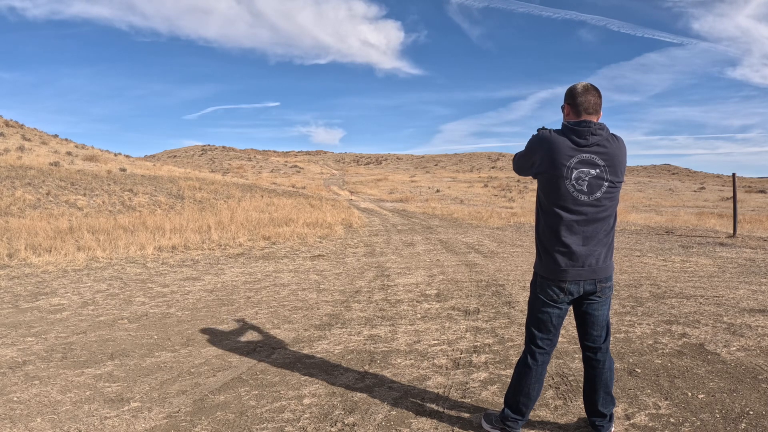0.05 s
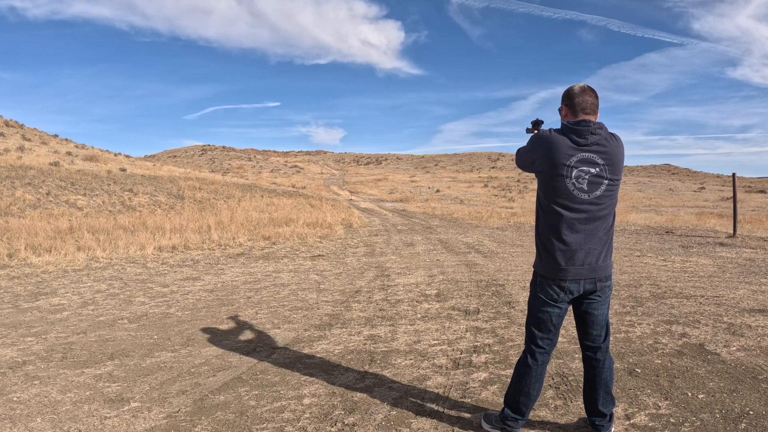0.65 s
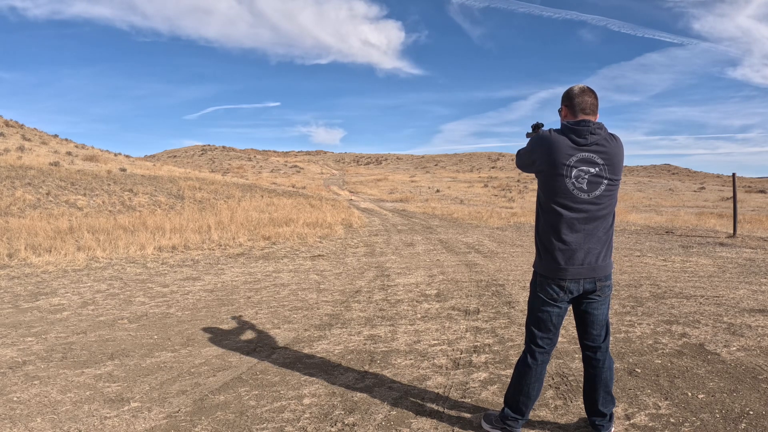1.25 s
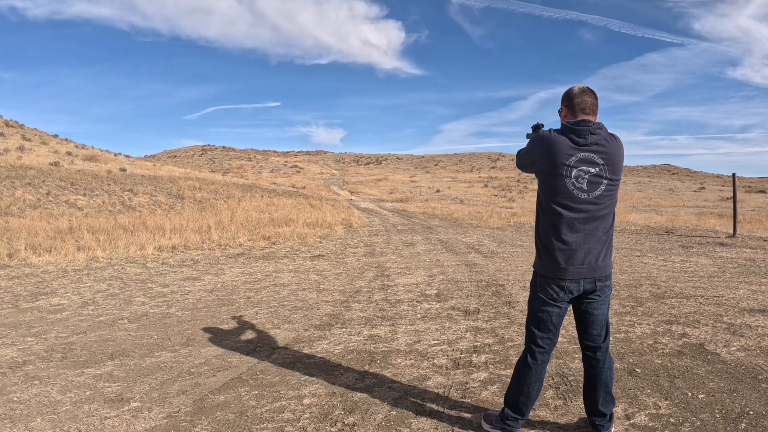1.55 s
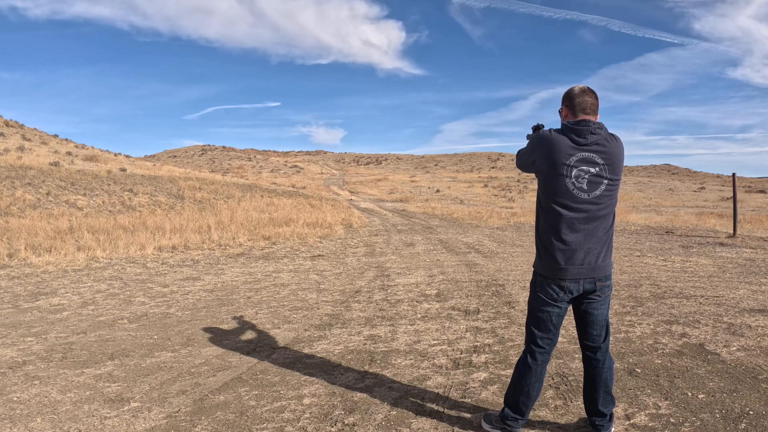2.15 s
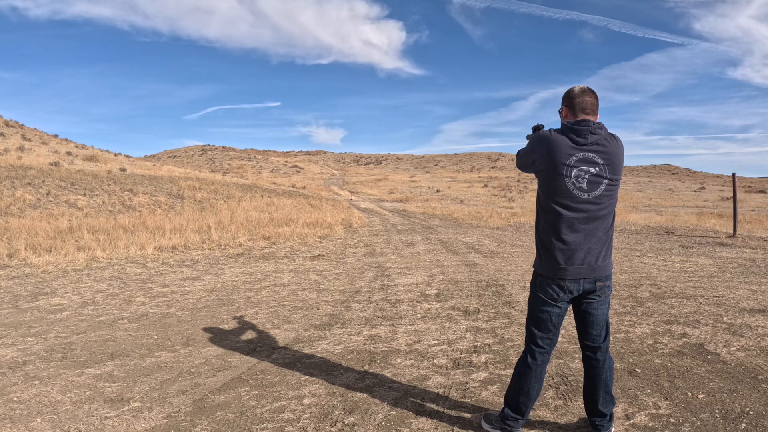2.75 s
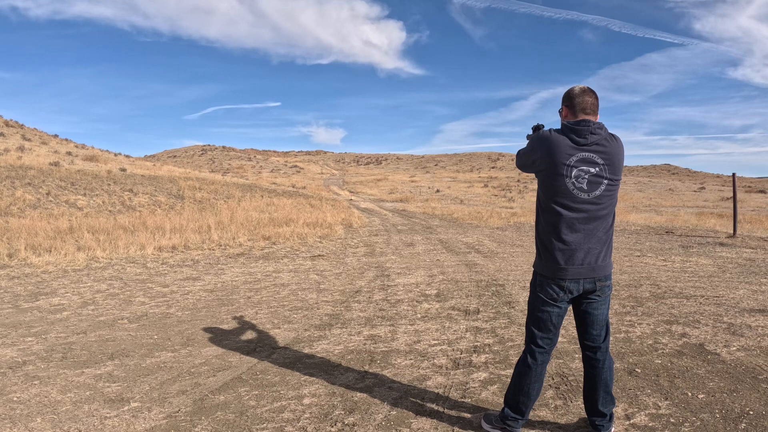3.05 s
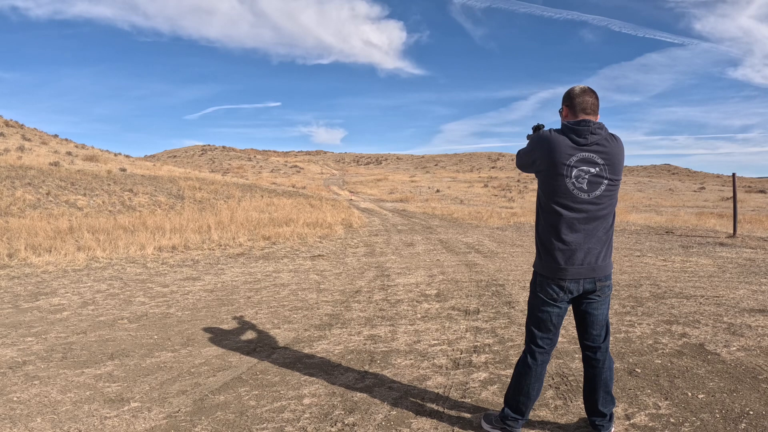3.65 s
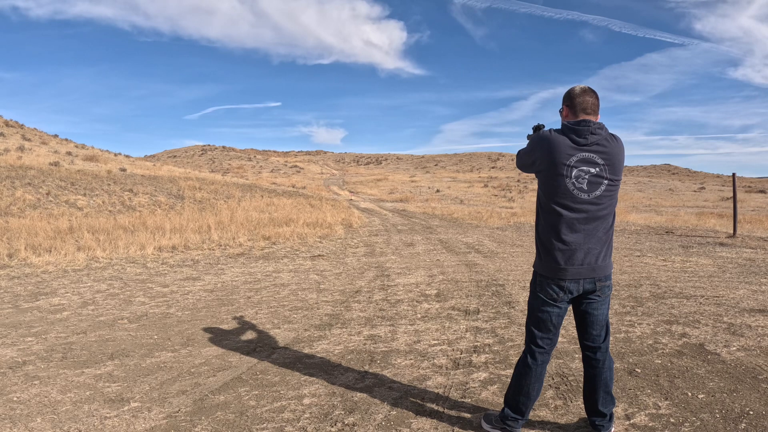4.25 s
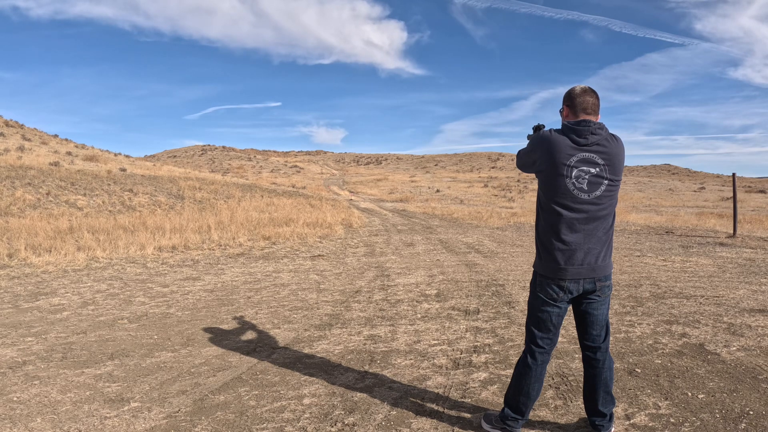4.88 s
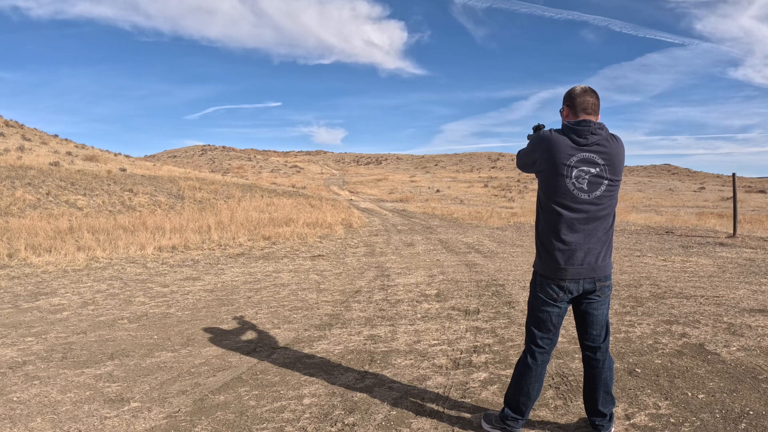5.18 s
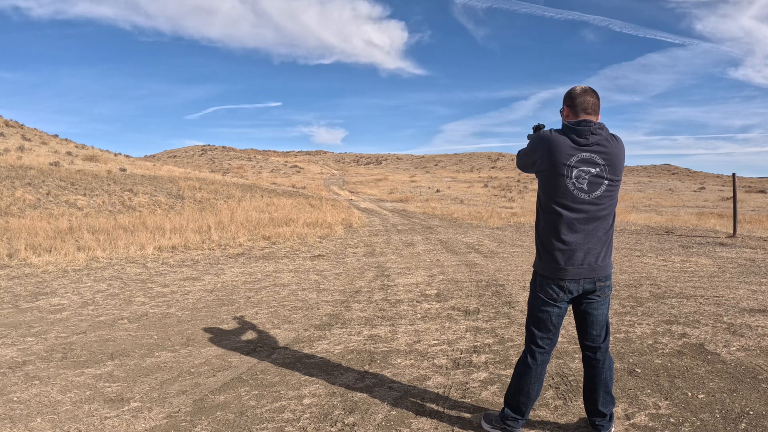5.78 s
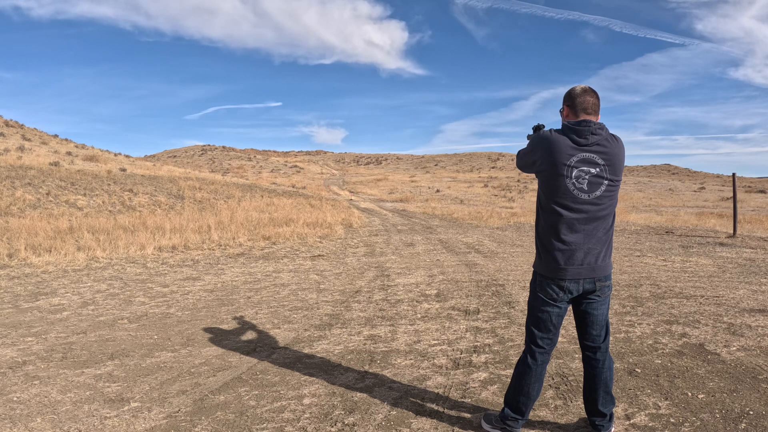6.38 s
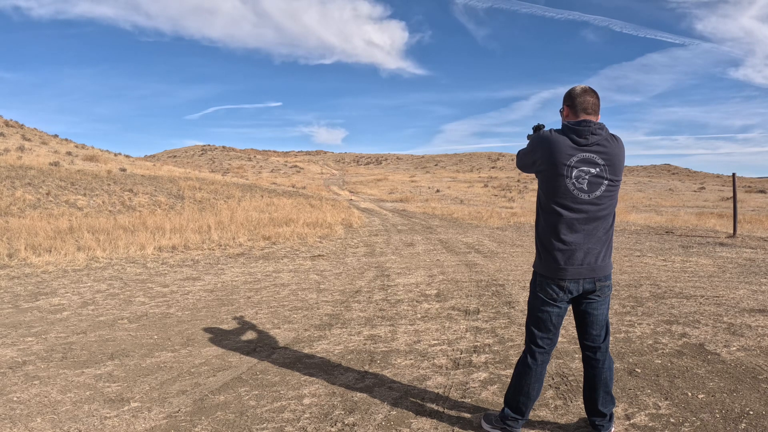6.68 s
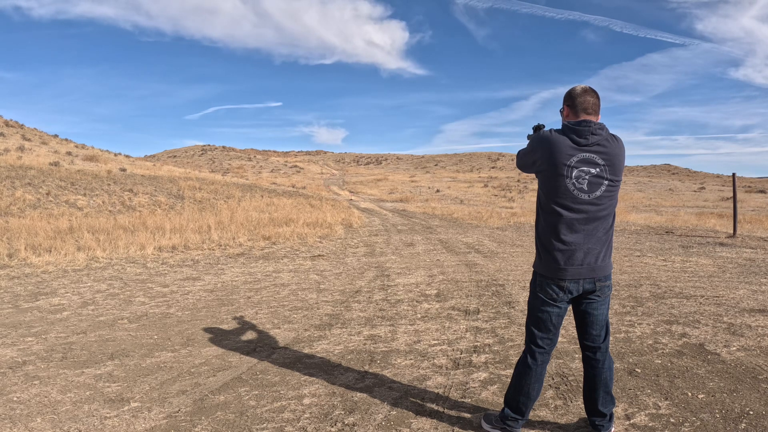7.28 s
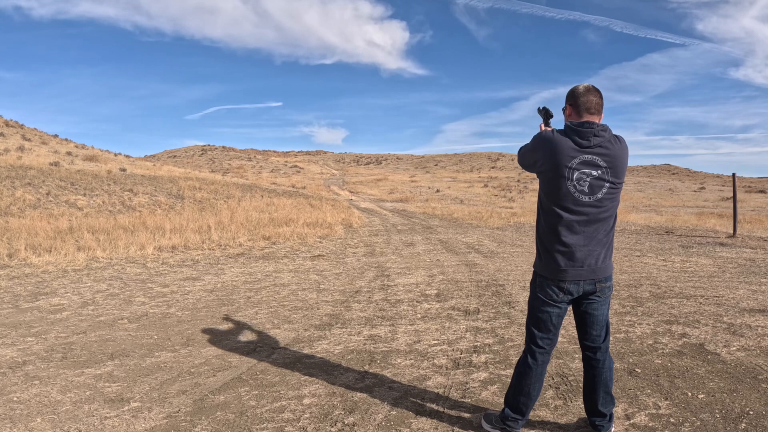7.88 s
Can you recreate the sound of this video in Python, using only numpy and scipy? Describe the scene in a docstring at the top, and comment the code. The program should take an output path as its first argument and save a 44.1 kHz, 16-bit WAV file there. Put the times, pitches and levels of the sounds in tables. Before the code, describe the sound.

A single revolver shot and the clear clang of a hit steel plate follow several seconds of gusty wind buffeting the microphone.

```python
"""A revolver fires on open rangeland, 7.6 s in: a sharp muzzle blast that ground and hillside scatter back.
A third of a second later the bullet hits a steel plate downrange and its modes clang.
At the start the hammer clicks as it is cocked, and the plate still rings from an earlier hit.
Gusts buffet the microphone throughout; distant birds whistle faintly."""
import sys
import numpy as np
from scipy import signal
from scipy.fft import rfft, irfft, next_fast_len
from scipy.io import wavfile
from scipy.ndimage import map_coordinates

SR = 44100
rng = np.random.default_rng(int(sys.argv[2]) if len(sys.argv) > 2 else 0)


def unload_wav(signal):
    """Save mono or channel-first audio to the path in sys.argv[1] as 16-bit WAV at rate SR, clipped to [-1, 1]."""
    wavfile.write(
        sys.argv[1],
        SR,
        np.round(np.clip(np.atleast_2d(signal).T, -1, 1) * 32767).astype(np.int16),
    )


N = 358533
SHOT_S = 7.6101  # blast reaches the microphone
GRAINS_PER_S = 600  # ticks in bullet splash and wind crackle

# spectrum of the noise swell: f/Hz, density/dB
SWELL_SPECTRUM = [(40, -10), (140, 9), (245, 5.5), (420, -14.5), (780, -16.5), (920, 3.5), (1120, -12),
                  (1500, 0.5), (1850, -1.5), (2130, 3.5), (2500, -6.5), (3100, -11.5), (5600, -16),
                  (7600, -13), (9000, -29), (15500, -45.5)]
# blast front and gas heave as damped sines: f/Hz, level/dB, t60/s
FRONT_MODES = [(980, 4, 0.0062), (1460, 1, 0.0072)]
HEAVE_MODES = [(246, -7.5, 0.026), (120, -14, 0.016)]


def revolver(swell_s=0.04, rise_s=0.032, bounce_s=0.00318, bounce_db=-10.5, heave_s=0.00533):
    """The muzzle blast: a sharp front, its ground bounce, then the heave of gas."""
    def pulse(delay_s, modes):
        return sum(ring(since(SHOT_S + delay_s), *mode) for mode in modes)

    # a rough burst of noise swells for 40 ms just before the bang
    swell = amp(-12.5) * envelope(SHOT_S - swell_s, rise_s, hold_s=swell_s - rise_s, t60=0.03)
    rough_burst = swell * noise(SWELL_SPECTRUM, side_db=-13.5)
    bounce = amp(bounce_db) * pulse(bounce_s, FRONT_MODES)
    blast = -(pulse(0, FRONT_MODES) + bounce + pulse(heave_s, HEAVE_MODES))
    # the steep front meets the two microphone ports out of step
    side = amp(-8) * filtered(blast, lambda hz: 1j / (1 + (hz / 4000) ** 2))
    shot = rough_burst + stereo(blast, side)
    return filtered(shot, lambda hz: pan(1, left_db=np.interp(hz, [150, 600], [-5.5, -0.3])))


# bullet strikes: t/s, level/dB, ring t60 factor, treble ring gain/dB
PLATE_STRIKES = [(-.2, -8.5, 1.024, 8), (7.946, -0.5, 2, -6.5)]
# plate modes: f/Hz, flare level/dB, ring level/dB, ring t60/s
PLATE_MODES = [(1233, -53, -55.5, 1.3), (1420, -56, -64, 1.3), (1962, -35, -30, 1.1), (4472, -62, -52, .95),
               (4828, -46, -63, .4), (7246, -40, -60, .5), (7526, -53, -65, .95), (10040, -50, -61, .4),
               (11000, -62, -78, .4), (12530, -59, -67, .45), (13960, -63, -79, .5)]
# fragment splash spectrum: f/Hz, density/dB
SPLASH_SPECTRUM = [(200, -8), (700, -0.5), (2600, -4.5), (4000, -2.5), (6800, -18), (8200, -36),
                   (12500, -23.5), (15000, -54)]


def plate(flare_t60_s=0.28, flutter_db=5, settle_s=0.2, highpass_hz=700):
    """The bullet slaps the steel and splashes; modes flare, then ring on. A low thump sounds with it."""
    low, high, splash, low_thump = np.zeros((4, N))
    shakes = [wobble(90) for _ in range(3)]
    drift_s = 1.5e-5 * wobble(70)  # moving air jitters the travel time
    for s, db, t60_factor, treble_db in PLATE_STRIKES:
        t = since(s + drift_s)
        slap = ring(t, hz=2050, db=db - 0.5, t60=0.0041) * (1 - np.exp(-t / 0.00035))
        low += slap
        splash += bursts([(s, db - 11, 0.005), (s, db - 35, 0.19)])
        low_thump += ring(t, hz=166, db=db - 31, t60=0.032)
        for k, (hz, flare_db, ring_db, t60) in enumerate(PLATE_MODES):
            flare = ring(t, hz, db + flare_db, flare_t60_s)
            lasting = ring(t, hz, db + ring_db, t60 * t60_factor)
            if hz < 3000:
                low += flare + lasting
            else:  # short waves beam, so they flutter while the plate shakes
                flutter = amp(flutter_db * shakes[k % 3] * np.exp(-t / settle_s))
                high += flutter * (flare + amp(treble_db) * lasting) * ramp(s, rise_s=0.0078) ** 2
    grains = unit(amp(3 * wobble(GRAINS_PER_S)))
    fragments = splash * grains * noise(SPLASH_SPECTRUM, side_db=-20)
    clang = low + swinging_tone(PLATE_STRIKES[-1][0]) + pan(high, left_db=2) + fragments
    # a small plate rings with no bass
    return low_thump + filtered(clang, lambda hz: hz ** 4 / (hz ** 4 + highpass_hz ** 4))


def swinging_tone(s, facing_s=0.068, facing_db=14):
    """One beamed mode of the plate struck at s, loudest as the plate swings to face the microphone."""
    facing = amp(facing_db * bump(s + facing_s, width_s=0.014))
    return facing * ramp(s, rise_s=0.018) * ring(since(s), hz=2802, db=-40.5, t60=0.96)


# answering slopes: delay/s, rise/s, hold/s, level/dB
SLOPE_ECHOES = [(.01, 0.053, 0.13, -58.5), (0.171, 0.048, 0.16, -50)]
# ground scatter and hillside spectra: f/Hz, density/dB
GROUND_SPECTRUM = [(40, -26), (130, 3.5), (270, -2.5), (500, -13.5), (1000, -13.5), (2000, -28),
                   (4000, -34.5), (7500, -39.5), (10000, -43.5), (15500, -58)]
HILLSIDE_SPECTRUM = [(150, 3.5), (600, -11), (1500, 1.5), (2800, 3.5), (6600, -9), (8200, -19),
                     (14000, -30.5)]


def landscape(slope_t60_s=0.34):
    """Grass and stones scatter the blast, weaker with distance; a near and a far slope answer."""
    t = since(SHOT_S)
    scatter = amp(-13) * (t > 0) * (1 + t / 0.006) ** -1.15 * noise(GROUND_SPECTRUM, side_db=-24)
    answer = sum(amp(db) * envelope(SHOT_S + delay_s, rise_s, hold_s, slope_t60_s)
                 for delay_s, rise_s, hold_s, db in SLOPE_ECHOES)
    return scatter + answer * amp(1.2 * wobble(63)) * noise(HILLSIDE_SPECTRUM, side_db=-13.5)


# cracks and echoes: t/s, level/dB, t60/s
CRACK_BURSTS = [(7.5681, -34.5, 0.009), (7.685, -24.5, 0.0057), (7.823, -30, 0.018), (7.839, -41, 0.018),
                (7.8552, -31.5, 0.013), (7.859, -43, 0.022), (7.9889, -36, 0.013)]
# their spectrum: f/Hz, density/dB
CRACK_SPECTRUM = [(200, -5), (700, -9), (1400, -4), (2600, 3.5), (4000, -9), (6500, -18), (9000, -43),
                  (15000, -52)]


def cracks():
    """Sharp cracks around the blast and echoes off banks and posts, each with a short pressure front."""
    fronts = sum(ring(since(s), hz=1350, db=db + 2.5, t60=0.0034) for s, db, _ in CRACK_BURSTS)
    return fronts + bursts(CRACK_BURSTS) * noise(CRACK_SPECTRUM, side_db=-17)


# cocking clicks: t/s, level/dB, t60/s
LOCK_CLICKS = [(.038, -61, 0.02), (.0688, -47.5, 0.031), (.083, -55, 0.086)]
# steel click spectrum: f/Hz, density/dB
CLICK_SPECTRUM = [(200, -30.5), (700, -1), (1400, 12), (2200, 13), (3500, 13.5), (6500, -13), (9000, -15),
                  (15000, -43)]


def lockwork():
    """Steel clicks as the hammer is drawn back and the cylinder locks."""
    return bursts(LOCK_CLICKS) * noise(CLICK_SPECTRUM, side_db=-37)


# gusts: t/s, buffet level/dB, rush level/dB
GUSTS = [(0.0, -51.5, -83), (0.2, -41.5, -81.5), (0.6, -44.5, -82), (1.22, -41, -78.5), (1.35, -27, -80),
         (1.44, -40.5, -77.5), (1.6, -32, -71.5), (1.88, -35, -81.5), (2.1, -38, -76.5), (2.38, -51, -81),
         (2.6, -35.5, -81), (2.8, -34, -74.5), (3.12, -31.5, -77.5), (3.3, -40.5, -81), (3.85, -36.5, -78),
         (4.15, -40.5, -80), (4.32, -36, -78.5), (4.55, -35.5, -77), (4.8, -38, -80), (5.5, -43, -80.5),
         (6.1, -29.5, -73.5), (6.23, -34.5, -75.5), (6.36, -42, -74), (6.53, -43.5, -79.5),
         (6.92, -33, -70), (7.5, -30, -67.5)]
# buffet, rush and crunch spectra: f/Hz, density/dB
BUFFET_SPECTRUM = [(10, -2.5), (22, 8), (42, 6.5), (80, -2.5), (135, -21.5), (215, -41.5), (330, -41),
                   (600, -83.5)]
RUSH_SPECTRUM = [(70, -2), (170, 18.5), (260, 12), (400, 1.5), (700, -7), (1400, -14), (2200, -23.5),
                 (4000, -31.5), (8000, -63), (14000, -69)]
CRUNCH_SPECTRUM = [(400, -3.5), (1500, -4), (3800, -1), (5500, -15), (9000, -34.5)]


def wind(drop_s=7.5, drop_db=-18.5, widen_s=5.56):
    """Turbulence rumbles and throbs on the ports in lumps; rushing air and soft crunches sound behind."""
    buffet_db, rush_db = curves(GUSTS) + drop_db * ramp(drop_s, rise_s=0.18)  # last gust drops away
    swirl = wobble(16)
    swirl = np.minimum(swirl, np.tanh(swirl))  # lulls go deeper than lumps rise
    lumps = amp(5 * swirl)
    throb_band = noise([(40, -17), (100, 7), (160, -4), (280, -28), (600, -88.5)], side_db=1)
    throb = unit(lumps * throb_band)
    buffet = unit(amp(2 * swirl) * noise(BUFFET_SPECTRUM, side_db=2))
    rumble = amp(buffet_db) * (amp(5) * buffet + amp(-9) * throb)
    rush = amp(rush_db + 18.5) * lumps ** 0.35 * noise(RUSH_SPECTRUM, side_db=4.5)
    grains = unit(amp(4 * np.clip(wobble(GRAINS_PER_S), -2, 1)))
    flicker = np.clip(2 * wobble(60) - 1, 0, 1)
    crunch = amp(0.79 * buffet_db - 54.5) * flicker * grains * noise(CRUNCH_SPECTRUM, side_db=-0.5)
    left, right = rumble + rush + crunch + eddies(grains)
    width = amp(-10.5) * ramp(widen_s, rise_s=1.16)  # mono at first, then widens in stereo
    return stereo((left + right) / 2, width * (left - right) / 2)


# single eddies: t/s, thump level/dB, f/Hz, crackle level/dB
EDDY_HITS = [(1.346, -26.5, 82, -68), (1.519, -23.5, 61, -73), (1.698, -23, 70, -85.5),
             (1.781, -26, 82.4, -87), (1.878, -28.5, 83.2, -89), (2.883, -23.5, 64, -70.5),
             (2.968, -22.5, 70, -71), (3.038, -21.5, 73.5, -72.5), (3.141, -21, 74, -70),
             (3.592, -35, 120.5, -81), (4.546, -23.5, 87.5, -97), (4.962, -24.5, 56.6, -73),
             (6.084, -21, 107.4, -70.5), (6.353, -32, 146, -95), (6.636, -27, 92.5, -76),
             (6.791, -23.5, 107, -98), (6.885, -27, 143, -74.5), (7.285, -26, 139, -74),
             (7.479, -24, 105, -79)]
# crackle spectrum: f/Hz, density/dB
CRACKLE_SPECTRUM = [(300, -7), (900, -3), (2500, -9), (5000, -13.5), (7800, -16.5), (10000, -38.5)]


def eddies(grains, half_width_cycles=0.46):
    """Each eddy thumps the microphone and breaks up in a flurry; a brief, faint crackle comes with it."""
    thumps, crackles, flurries = np.zeros((3, N))
    for s, db, hz, crackle_db in EDDY_HITS:
        thumps += amp(db) * bump(s, half_width_cycles / hz) * np.cos(2 * np.pi * hz * (clock() - s))
        crackles += amp(crackle_db) * np.tanh(2 * bump(s, width_s=0.012))
        flurries += amp(db - 22) * (hz / 100) ** 2.35 * bump(s, width_s=0.025)
    flurry_band = noise([(120, -11), (210, 3), (330, -12), (500, -25.5), (1500, -68)], side_db=0.5)
    return thumps + flurries * flurry_band + crackles * grains * noise(CRACKLE_SPECTRUM, side_db=4.5)


# whistles: t/s, length/s, start f/Hz, end f/Hz, level/dB
BIRD_WHISTLES = [(0, 0.11, 4050, 3870, -75), (0.073, 0.065, 3070, 2875, -63), (0.2, 0.088, 3820, 3670, -80),
                 (0.343, 0.091, 4550, 4390, -76.5), (0.493, 0.054, 4270, 2450, -71.5),
                 (0.578, 0.079, 2087, 2053, -74), (0.636, 0.15, 3040, 2700, -84.5),
                 (0.759, 0.082, 1430, 2770, -70.5), (0.843, 0.048, 4570, 2720, -67.5),
                 (0.946, 0.036, 3680, 3350, -73), (0.98, 0.067, 1730, 2600, -70.5),
                 (1.039, 0.12, 2660, 2446, -71.5), (4.308, 0.12, 2480, 2170, -88.5),
                 (4.68, 0.07, 3320, 3230, -89), (4.81, 0.11, 2600, 2510, -86.5),
                 (4.97, 0.063, 1870, 1760, -83), (5.717, 0.06, 2415, 2330, -86),
                 (7.297, 0.05, 3390, 3310, -77.5), (7.368, 0.082, 3460, 2660, -74.5)]


def birds(rasp=0.1, flutter_db=3, echo_db=-13, echo_t60_s=0.25):
    """Thin fluttering whistles glide and level off; wide sweeps rasp, and all trail off over the field."""
    t = clock()
    song, jitter = np.zeros(N), wobble(550)
    for s, length_s, start_hz, end_hz, db in BIRD_WHISTLES:
        inside = (t >= s) & (t < s + length_s)
        progress = (t[inside] - s) / length_s
        glide_hz = end_hz + (start_hz - end_hz) * np.abs(1 - progress) ** 1.6
        hz = glide_hz * (1 + rasp * np.log(start_hz / end_hz) * jitter[inside])
        arch = np.abs(np.sin(np.pi * progress)) ** 0.5
        song[inside] += amp(db) * arch * np.sin(2 * np.pi * np.cumsum(hz) / SR)
    song *= amp(flutter_db * wobble(110))
    tail = rng.standard_normal(SR // 2) * amp(-60 * t[:SR // 2] / echo_t60_s)
    return song + amp(echo_db) * signal.fftconvolve(song, tail / np.linalg.norm(tail))[:N]


def air():
    """A very faint, steady hiss."""
    return amp(-103) * noise([(100, -3.5), (3000, 10), (5000, -12.5), (15000, -11)], side_db=-15)


def amp(db):
    """Decibels to gain."""
    return 10 ** (np.asarray(db) / 20)


def unit(x):
    """x at rms 1."""
    return x / np.sqrt(np.mean(x ** 2) + 1e-20)


def clock():
    """Sample times in seconds."""
    return np.arange(N) / SR


def since(s):
    """Time since s, zero before it."""
    return np.maximum(clock() - s, 0)


def curves(rows):
    """Each column after the time, interpolated per sample."""
    times, *columns = np.transpose(rows)
    return np.array([np.interp(clock(), times, column) for column in columns])


def ramp(s, rise_s):
    """Linear rise from 0 at s to 1."""
    return np.minimum(since(s) / rise_s, 1)


def bump(s, width_s):
    """Bell of height 1 around s."""
    return np.exp(-np.minimum(((clock() - s) / width_s) ** 2, 50))


def decay(t, t60):
    """Exponential fall, 60 dB per t60."""
    return amp(-60 * np.minimum(t / t60, 4))


def envelope(s, rise_s, hold_s, t60):
    """Curved rise, hold, exponential release."""
    return ramp(s, rise_s) ** 2 * decay(since(s + rise_s + hold_s), t60)


def bursts(rows):
    """Envelope with a fast rise and a decay per row: t/s, level/dB, t60/s."""
    return sum(amp(db) * decay(since(s), t60) * np.tanh(since(s) / 0.00045) for s, db, t60 in rows)


def ring(t, hz, db, t60):
    """Damped sine."""
    return amp(db) * decay(t, t60) * np.sin(2 * np.pi * hz * t)


def wobble(knots_per_s):
    """Smooth random curve."""
    knots = rng.standard_normal(int(N * knots_per_s / SR) + 4)
    return map_coordinates(knots, [clock() * knots_per_s])


def filtered(x, response):
    """x through a frequency response."""
    size = next_fast_len(N + 8192)
    return irfft(rfft(x, size) * response(np.fft.rfftfreq(size, 1 / SR)), size)[..., :N]


def noise(spectrum, side_db):
    """Stereo noise of rms 1 from rows of f/Hz, density/dB; side_db sets its width."""
    hz, db = np.transpose(spectrum)
    white = rng.standard_normal((2, N))
    mid, side = filtered(white, lambda f: amp(np.interp(np.log(f + 1), np.log(hz), db)))
    return unit(stereo(mid, amp(side_db) * side))


def stereo(mid, side):
    """Mid and side to left and right."""
    return np.array([mid + side, mid - side])


def pan(x, left_db):
    """x with left over right by left_db."""
    return np.array([x * amp(left_db / 2), x * amp(-left_db / 2)])


def scene():
    """All sources at the two microphone ports."""
    return revolver() + plate() + landscape() + cracks() + lockwork() + wind() + birds() + air()


def record(dry, droop_hz=13500, limit_hz=15700):
    """The blast overloads the input softly; the top octave droops, then cuts off at the band limit."""
    clipped = dry / (1 + np.abs(dry) ** 6) ** (1 / 6)
    return filtered(clipped, lambda hz: (hz < limit_hz) / np.sqrt(1 + (hz / droop_hz) ** 8))


dry = scene()
out = record(dry)
unload_wav(out)
```